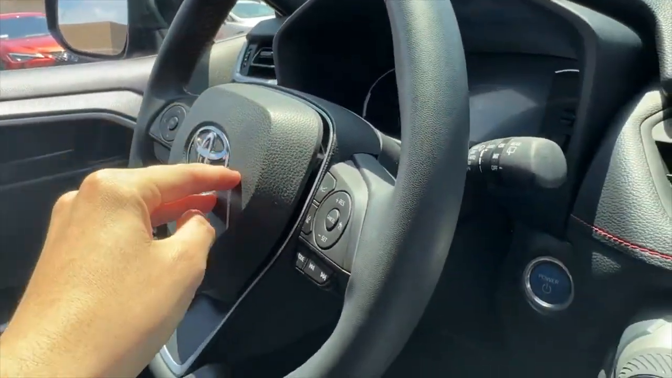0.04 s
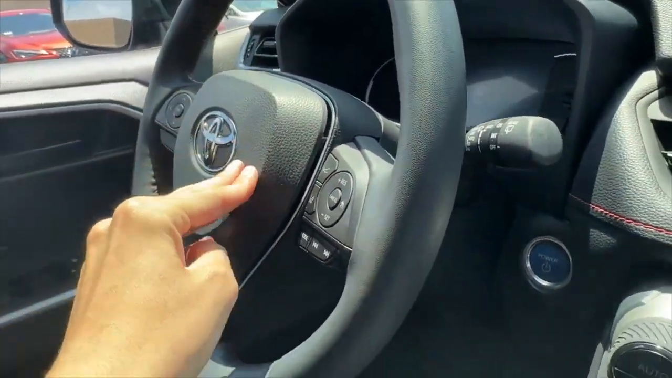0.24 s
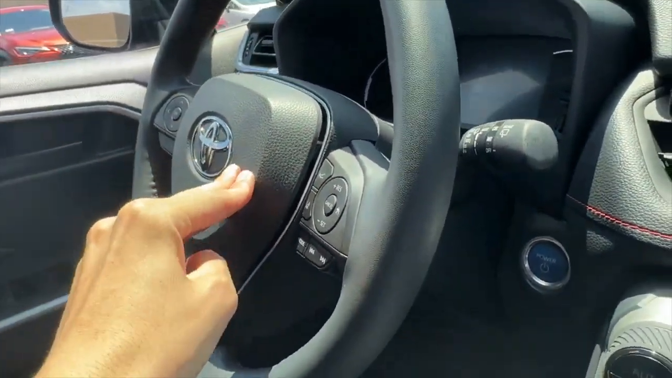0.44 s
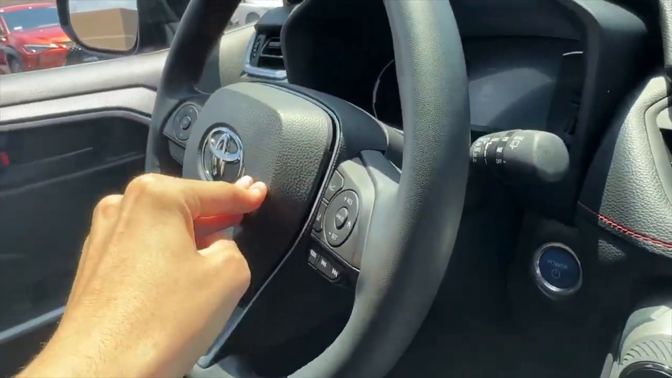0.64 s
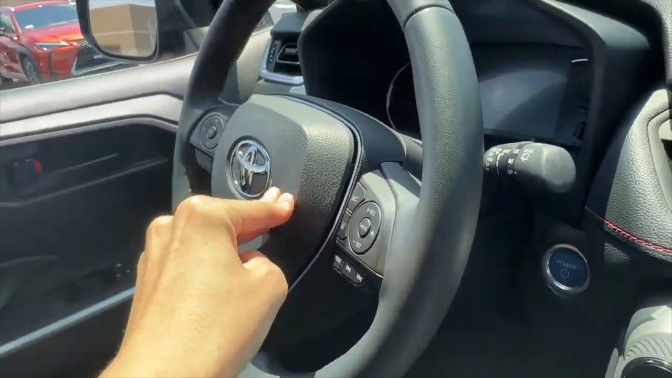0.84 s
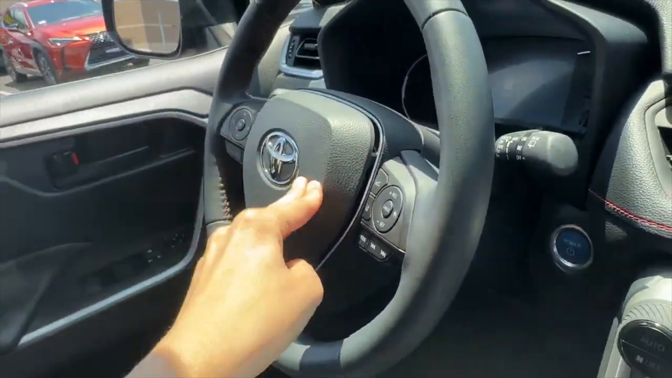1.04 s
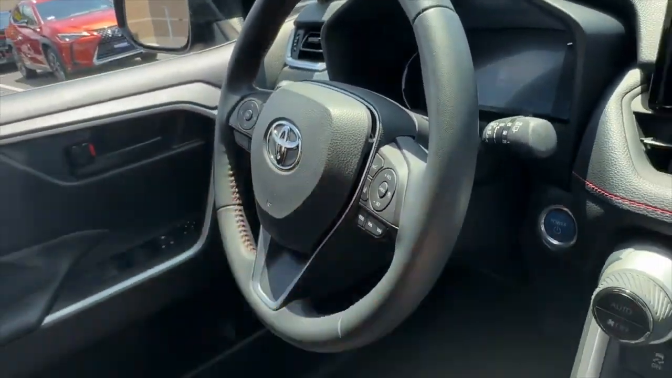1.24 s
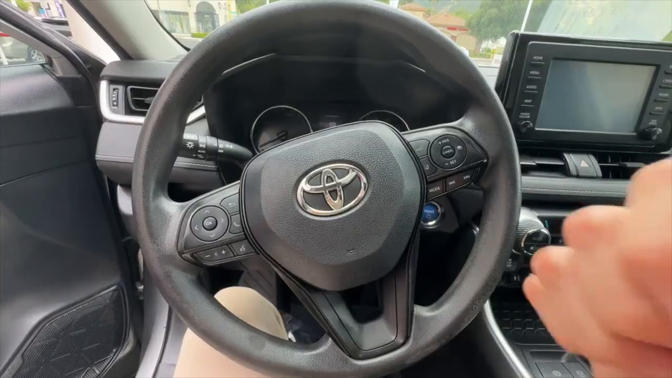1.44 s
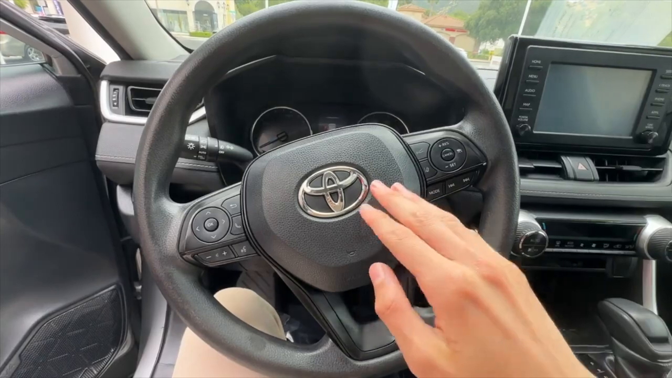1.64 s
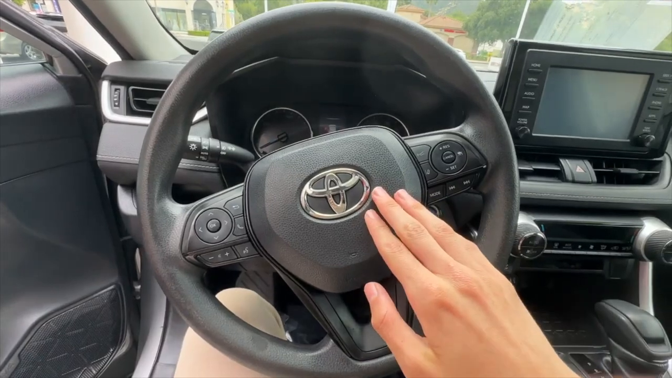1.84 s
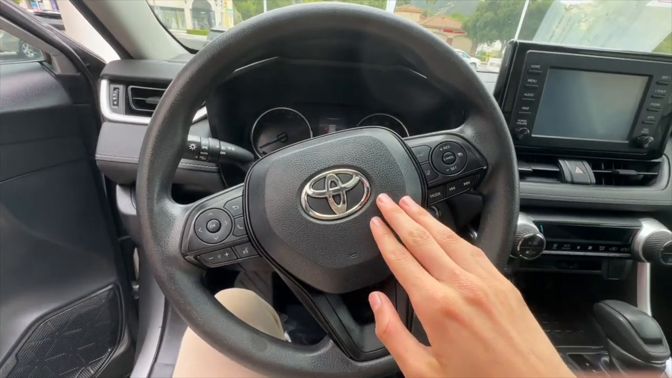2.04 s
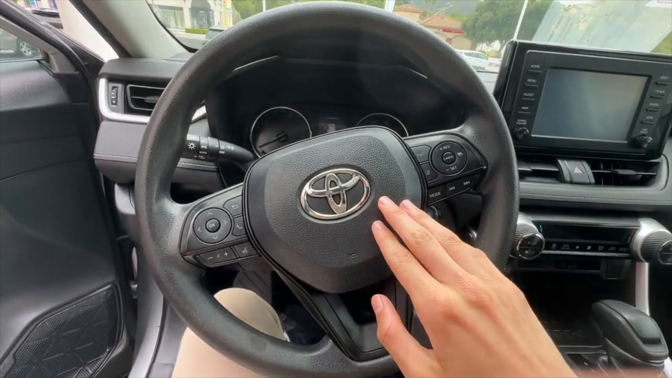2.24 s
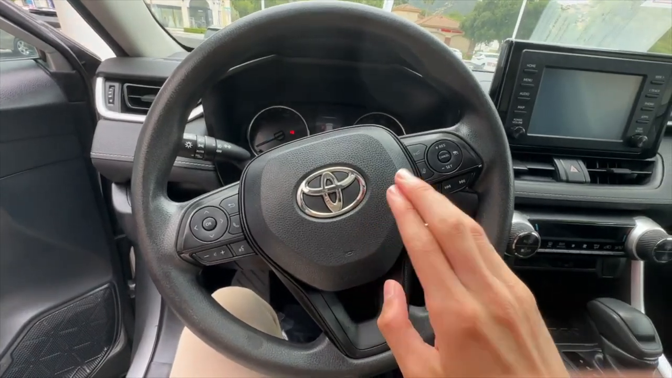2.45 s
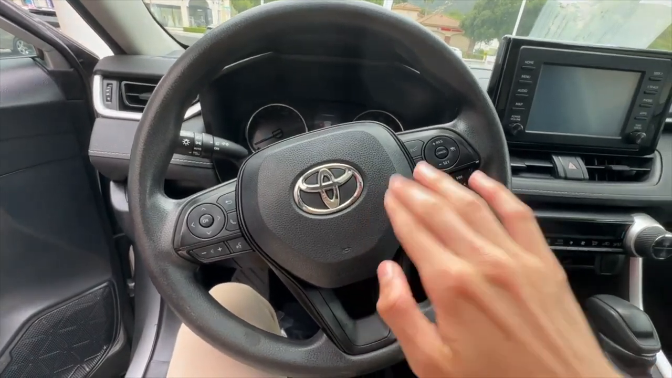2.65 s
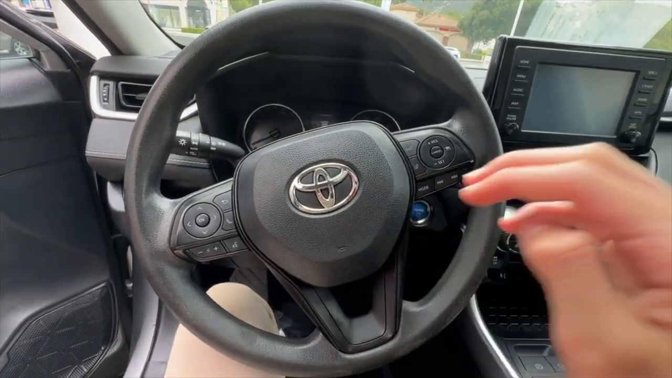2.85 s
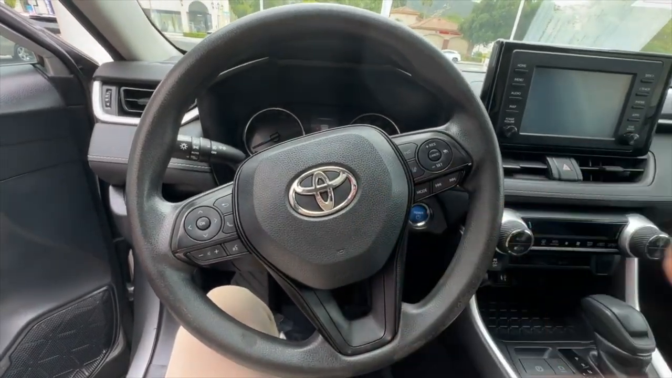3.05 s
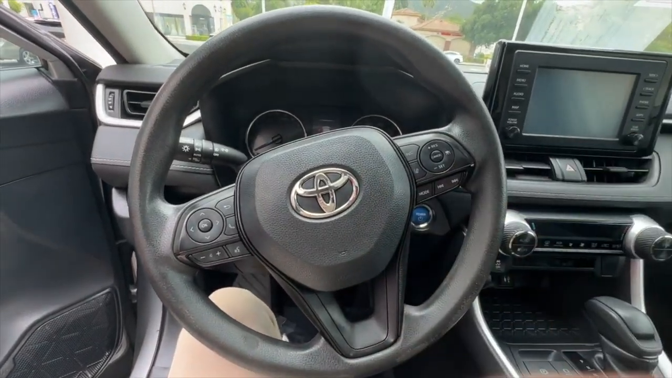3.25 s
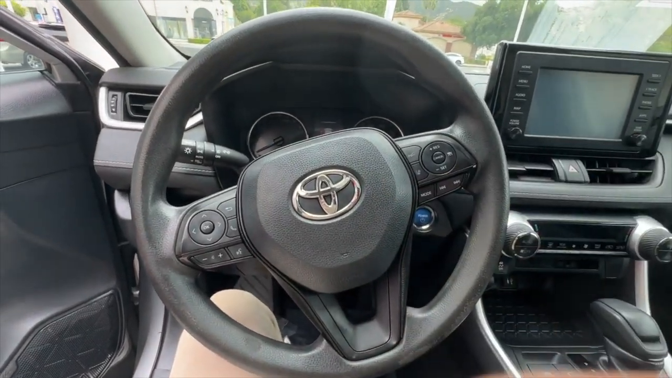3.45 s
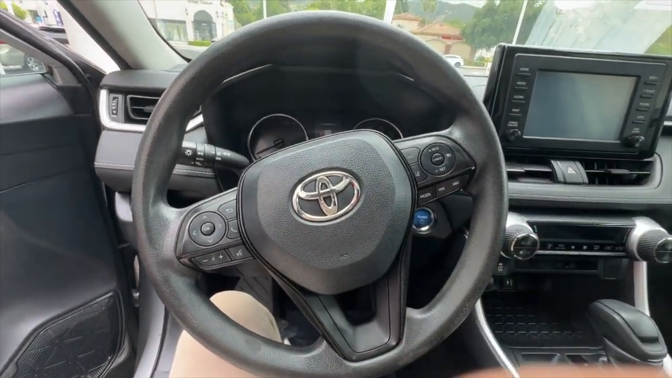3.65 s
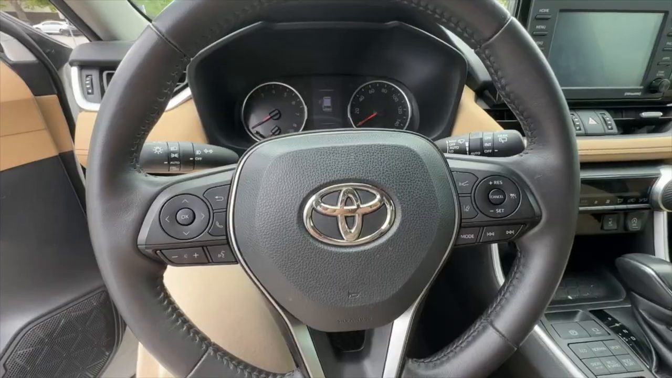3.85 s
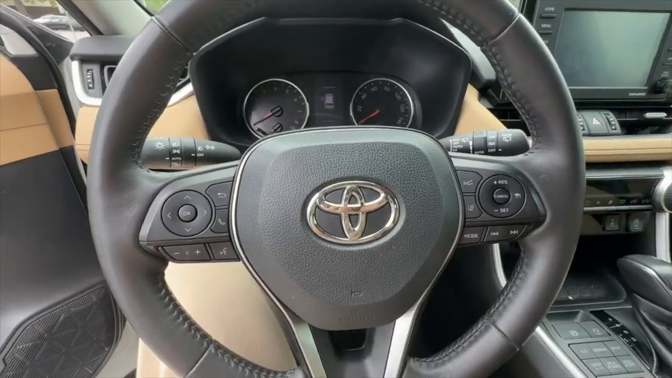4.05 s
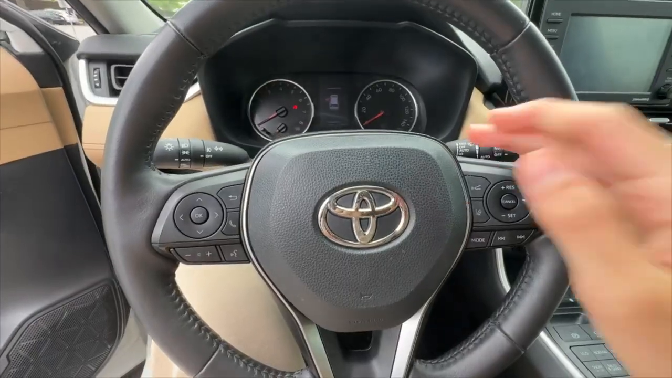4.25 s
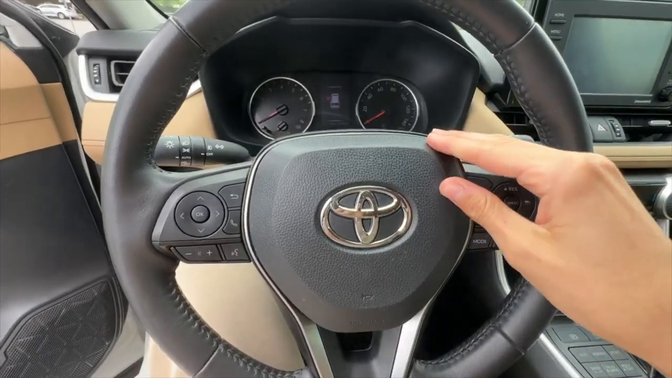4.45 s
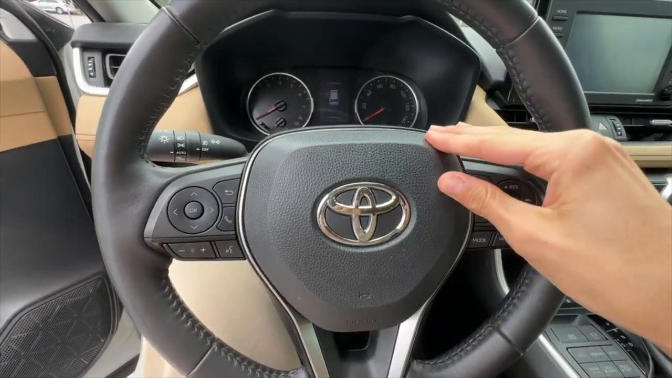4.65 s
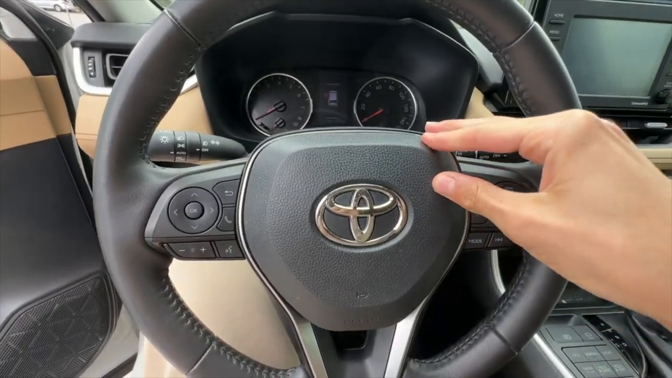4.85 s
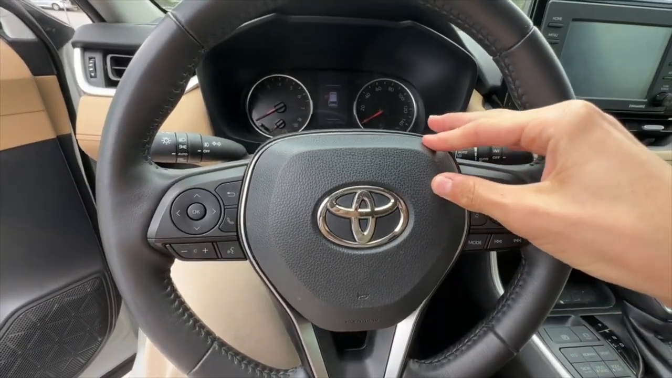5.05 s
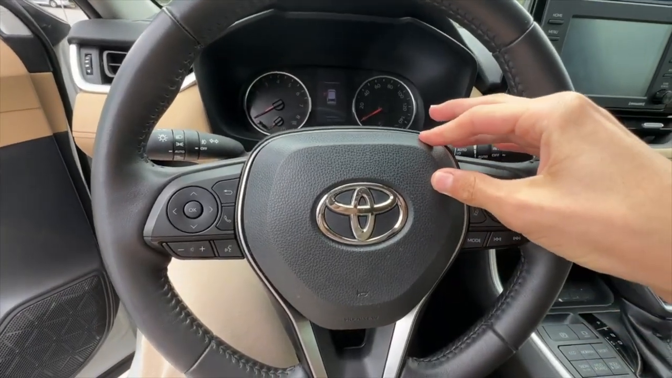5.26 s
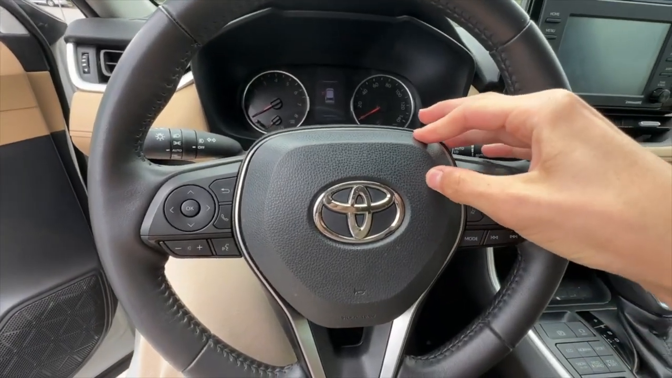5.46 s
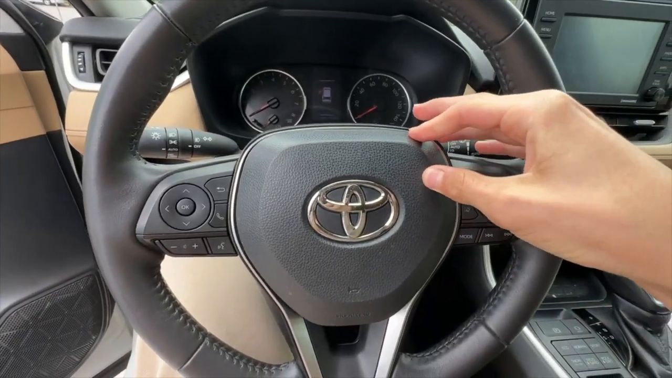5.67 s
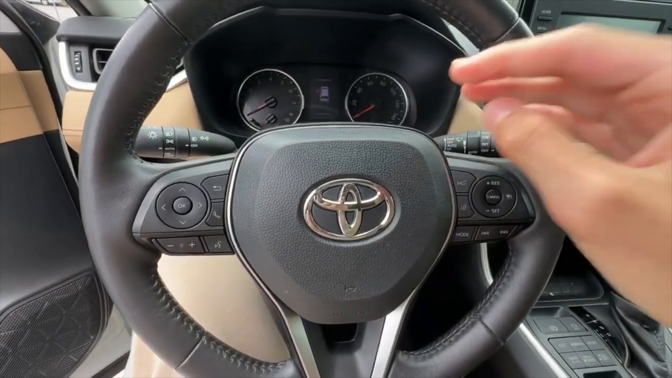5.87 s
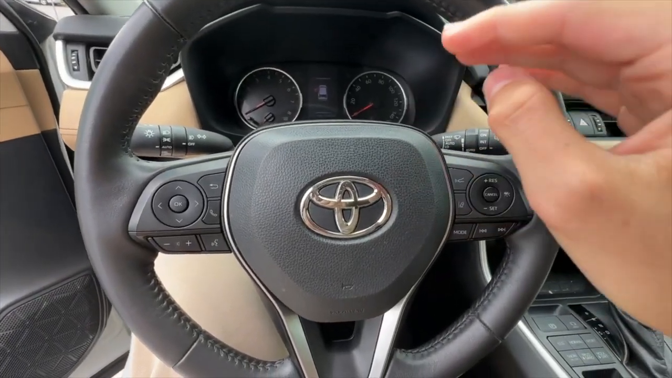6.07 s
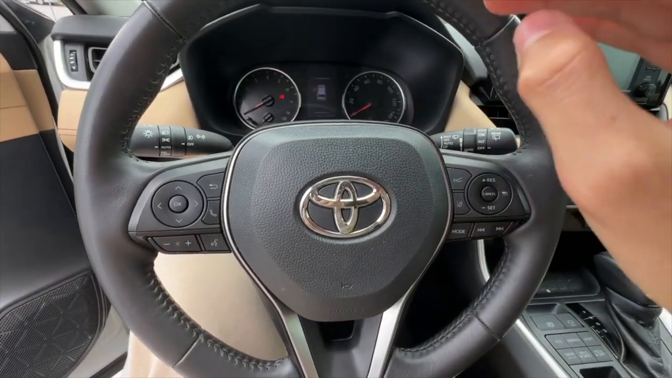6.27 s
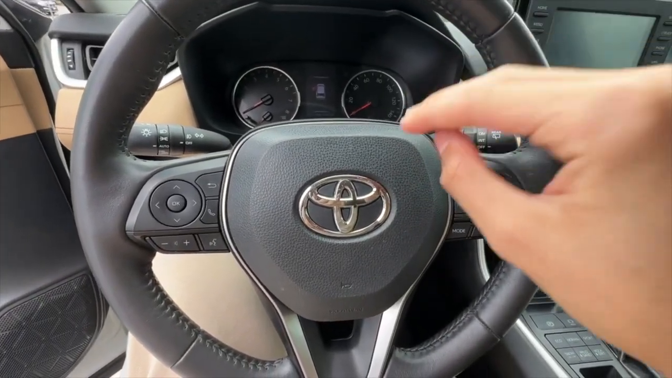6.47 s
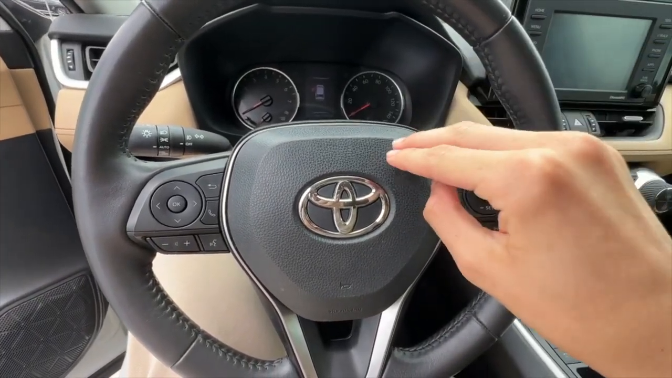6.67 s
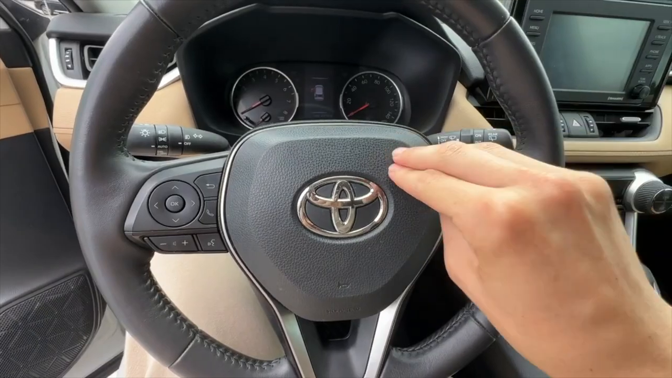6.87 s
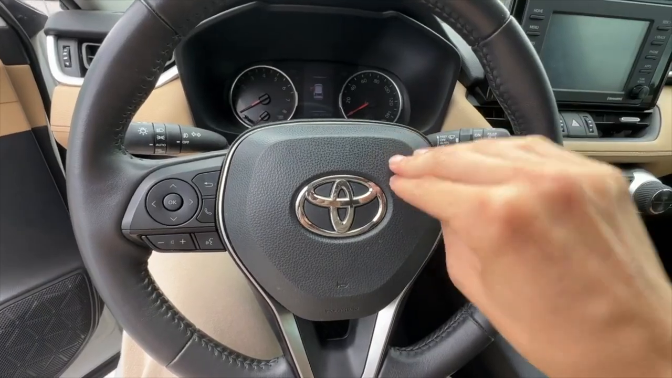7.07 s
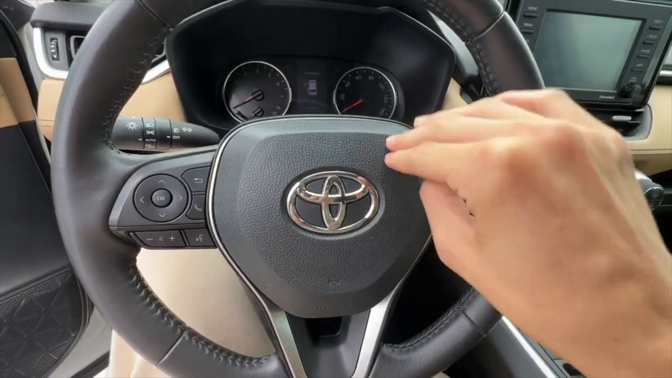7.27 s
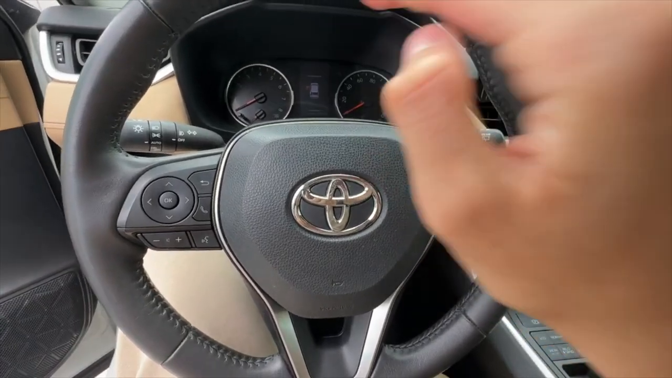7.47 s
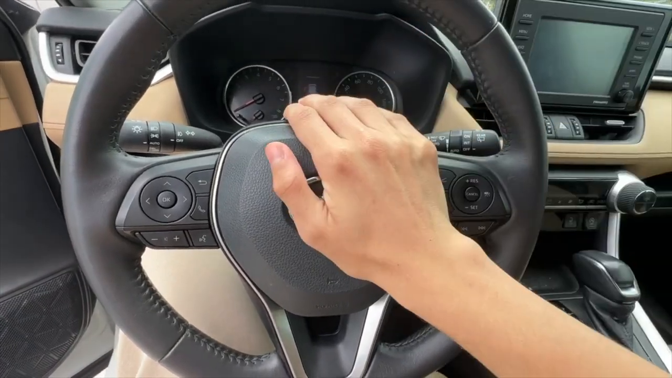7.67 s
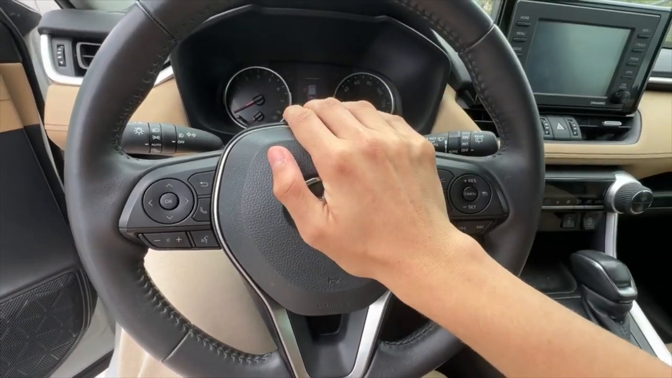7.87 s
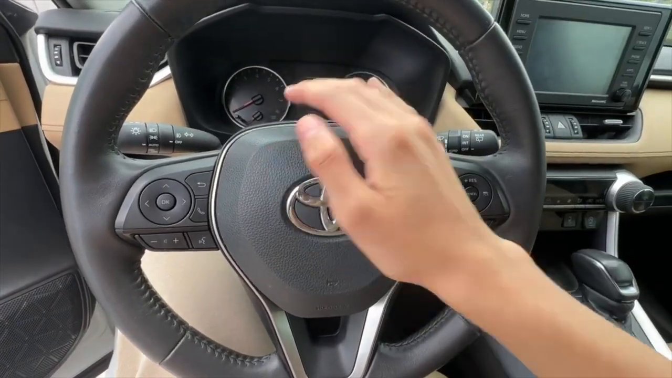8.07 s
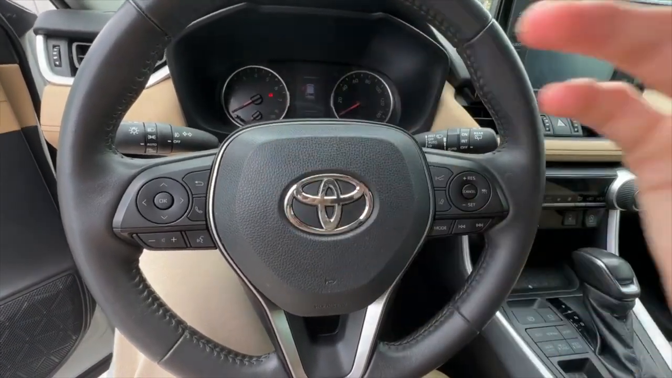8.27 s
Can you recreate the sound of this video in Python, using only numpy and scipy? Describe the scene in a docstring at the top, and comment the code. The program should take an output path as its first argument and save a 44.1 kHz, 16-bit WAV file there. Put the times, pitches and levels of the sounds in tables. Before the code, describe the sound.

In a parked car, faint air and traffic noise and low rumble sit under light taps on the wheel pad. From 0.2 s a two-note buzzing horn gives three very short honks, then a longer blast from 0.6 to 1.0 s, with small taps and skin rustle after. A brief silent cut at 1.4 s leads to a second cabin, quiet until a hard hollow knock at 2.5 s and a clipped, rattly beep that echoes outside. Another cut at 3.7 s: brushing, soft clicks, two faint bird whistles near 3.8 and 4.2 s. Light taps bring a tiny blip at 5.0 s, a short honk at 5.2 and a slightly longer one at 5.5. Soft knocks and boomy thuds around 7 s precede a heavy, sharp slap at 7.55 s, then a final honk from 7.7 to 7.95 s, its ring and echo fading into hand rustle.

```python
"""A pair of disc horns under the hood honks: low hum through the body, hammered buzz through the air and back
from the lot. Each is a set of wandering harmonics with clatter and free ringing. A hand taps and slaps the
steering-wheel pad (ringing modes, crack, hiss) and brushes it (grainy noise). Behind lie coloured air and
traffic noise, a narrow idle rumble and a faint whistling bird. Three shots inside parked cars, joined by
short silent cuts."""
import sys
import numpy as np
from scipy import signal
from scipy.io import wavfile
from scipy.ndimage import uniform_filter1d

SR = 44100
rng = np.random.default_rng(int(sys.argv[2]) if len(sys.argv) > 2 else 0)


def magnitude_from_level(level_db):
    """Linear magnitude for a level in decibels (20 dB per decade)."""
    exponent = np.asarray(level_db, float) / 20
    return 10 ** exponent


def digitize_waveform(pressure):
    """Quantize a signal to 16-bit integers and store it at the path in sys.argv[1].

    Rows of a 2-D input are taken as channels; values are limited to [-1, 1].
    """
    field = np.atleast_2d(pressure).T
    bounded = np.clip(field, -1, 1)
    quanta = np.round(bounded * 32767).astype(np.int16)
    wavfile.write(sys.argv[1], SR, quanta)


N = 366471

# shots: start_s, end_s, wash_db (before drift), cabin_right_delay_ms, wash_left_minus_right_db
SHOTS = [(0, 1.383, -45, -0.19, -1), (1.417, 3.684, -46.5, 0.37, 6), (3.718, 8.4, -44.5, .45, 5.5)]
# horn pair per car: low_horn_hz, high_horn_hz, start_pitch_offset_share, high_horn_buzz_rise_s, run_on_scale_s,
# buzz_t60_s, right_delay_ms, diffuse_echo_db, echo_t60_s
CARS = [(368.8, 419.5, -.025, 0.012, .03, .1, 0.019, -21, .45),
        (353.7, 417.85, 0.018, .012, 0.0158, 0.14, 0.1, -15, .9)]
# horn harmonics per car: harmonic, low_horn_left_db, low_horn_right_db, high_horn_left_db, high_horn_right_db
PARTIALS = [
    [(1, -33, -34, -37, -29), (2, -40, -52, -49, -50), (3, -53, -50, -53, -54), (4, -55, -53, -60, -60),
     (5, -58, -54, -57, -52), (6, -46, -46, -47, -43), (7, -42, -42, -41, -42), (8, -33, -30, -47, -44),
     (9, -36, -34, -42, -44), (10, -33, -34, -48, -44), (11, -50, -49, -48, -64), (12, -59, -63, -53, -58),
     (13, -63, -63, -52, -52), (14, -58, -58, -44, -55), (15, -56, -63, -58, -53), (16, -62, -62, -51, -56),
     (17, -57, -67, -53, -53), (18, -51, -55, -60, -59), (19, -63, -61, -60, -57), (20, -58, -62, -57, -57),
     (21, -68, -70, -64, -51), (22, -65, -69, -56, -58), (23, -57, -62, -60, -63), (24, -64, -59, -64, -64),
     (25, -57, -59, -76, -76), (26, -76, -72, -81, -81), (27, -74, -79, -74, -74), (28, -81, -81, -76, -76),
     (29, -76, -76, -69, -69), (30, -76, -76, -69, -69), (31, -83, -83, -76, -76), (32, -78, -78, -78, -78),
     (33, -69, -69, -75, -76), (34, -80, -80, -75, -76), (35, -72, -72, -75, -76), (36, -81, -81, -74, -75),
     (37, -72, -72, -75, -75), (38, -80, -80, -90, -90), (39, -73, -74, -90, -90), (40, -74, -73, -90, -90),
     (41, -74, -75, -90, -90), (42, -78, -80, -90, -90), (43, -90, -90, -90, -90), (44, -90, -90, -90, -90)],
    [(1, -33, -33, -33, -40), (2, -59, -48, -47, -59), (3, -51, -54, -58, -61), (4, -57, -56, -59, -58),
     (5, -44, -47, -54, -56), (6, -42, -48, -40, -51), (7, -44, -52, -36, -39), (8, -28.5, -38, -30, -50),
     (9, -20, -33, -37, -51), (10, -33, -44, -41, -52), (11, -42, -60, -37, -47), (12, -38, -45, -44, -60),
     (13, -38.5, -48, -50, -59), (14, -38, -53, -49, -59), (15, -46, -60, -49, -66),
     (16, -46, -58, -51, -57), (17, -51, -61, -56, -56), (18, -57, -58, -61, -66), (19, -57, -61, -49, -62),
     (20, -41, -56, -58, -62), (21, -60, -69, -55, -57), (22, -50, -61, -61, -57), (23, -50, -59, -67, -63),
     (24, -61, -58, -61, -58), (25, -57, -61, -60, -58), (26, -61, -57, -55, -55), (27, -57, -54, -61, -60),
     (28, -51, -50, -67, -67), (29, -57, -53, -73, -73), (30, -53, -52, -68, -68), (31, -57, -56, -58, -58),
     (32, -59, -59, -69, -67), (33, -69, -69, -63, -62), (34, -61, -61, -73, -73), (35, -70, -70, -65, -63),
     (36, -65, -65, -64, -64), (37, -69, -69, -76, -76), (38, -57, -57, -90, -90), (39, -63, -62, -90, -90),
     (40, -71, -73, -90, -90), (41, -79, -79, -90, -90), (42, -72, -78, -90, -90), (43, -73, -73, -90, -90),
     (44, -81, -81, -90, -90)],
]
# hiss spectrum of skin on vinyl, leather or cloth: frequency_hz, relative_db
SKIN = [(1500, -16.5), (3000, 2), (6000, -11), (9500, -3), (12000, -9), (15500, -18.5), (17000, -53.5)]


def evened(x):
    """Scales to rms 1."""
    return x / np.sqrt(np.mean(x ** 2) + 1e-20)


def read(points, hz):
    """Reads a spectrum on a log-frequency axis."""
    f, value = np.transpose(points)
    return np.interp(np.log(hz + 1), np.log(f + 1), value)


def add(mix, s, sound):
    """Mixes a two-channel sound in at time s."""
    part = mix[:, round(s * SR):][:, :sound.shape[1]]
    part += sound[:, :part.shape[1]]


def fading(t, t60):
    """Decay by 60 dB in t60."""
    return magnitude_from_level(-60 * np.maximum(t, 0) / t60)


def peak(t, s, db, rise_db_per_s, fall_db_per_s):
    """Gain that climbs to db at time s and falls again, both at a steady rate in dB."""
    return magnitude_from_level(db - np.where(t < s, rise_db_per_s * (s - t), fall_db_per_s * (t - s)))


def shot_at(t):
    """Index of the shot that runs at time t."""
    return np.searchsorted(np.transpose(SHOTS)[1], t)


def running(start, end):
    """Gain of one shot: a quick fade in after a cut, a sharp end."""
    t = np.arange(N) / SR
    fade_in = np.clip((t - start) / 0.0099 + (start == 0), 0, 1)
    return fade_in * np.clip((end - t) / .003, 0, 1)


def noise(size, colour, same, patchy_db):
    """Two-channel noise from random short-time spectra with drifting patches; same sets left-right likeness."""
    hz = np.fft.rfftfreq(1024, 1 / SR)
    a, b, c, d, patches = rng.standard_normal((size // 256 + 5, 513, 5)).T
    patches = uniform_filter1d(patches, size=8, axis=0)
    patches = evened(uniform_filter1d(patches, size=12, axis=1))
    like = np.clip(read(same, hz), 0, 1)[:, None]
    left = a + 1j * b
    right = like * left + np.sqrt(1 - like ** 2) * (c + 1j * d)
    z = np.array([left, right]) * magnitude_from_level(read(colour, hz)[:, None] + patchy_db * patches)
    return evened(signal.istft(z, nperseg=1024, noverlap=768)[1][:, :size])


def wash():
    """Air and traffic noise, coloured by each cabin, drifting in level."""
    # spectrum per shot: frequency_hz, relative_db_per_hz
    wash_spectra = [
        [(53, -40), (90, -12.5), (150, -0.5), (186, -21), (221, -7.5), (347, -20.5), (499, -23), (532, -26),
         (799, -15), (1150, -13.5), (1730, -20), (6240, -41.5), (15000, -59)],
        [(35, -37.5), (60, -7.5), (97, 1.5), (132, -12), (199, -1), (246, -21), (295, -7.5), (355, -32.5),
         (503, -11.5), (564, -23.5), (816, -10.5), (960, -15), (1420, -16), (5950, -44), (15000, -70)],
        [(47, -37), (80, -1), (148, -10.5), (196, -3.5), (244, -25), (304, -11), (503, -17), (613, -23),
         (993, -12.5), (1210, -19.5), (1720, -24), (2490, -36), (2900, -34), (3690, -43), (15000, -77.5)],
    ]
    # left-right likeness: frequency_hz, likeness_share
    likeness = [(60, 0.91), (250, 0.82), (1000, 0.65), (3000, 0.35), (10000, 0.46)]
    # level drift: time_s, level_db
    drift = [(0, 2), (.3, 3), (1.1, 3), (1.5, -0.5), (2.5, 0.5), (3.6, 1.5), (4.2, -1), (5, 0), (6, -1),
             (7, -1), (8.3, 0)]
    out = np.zeros((2, N))
    for (start, end, db, _, pan_db), colour in zip(SHOTS, wash_spectra):
        part = noise(round((end - start) * SR), colour, likeness, patchy_db=1.5)
        add(out, start, part * magnitude_from_level(db + np.array([[pan_db], [-pan_db]]) / 2))
    return out * magnitude_from_level(np.interp(np.arange(N) / SR, *np.transpose(drift)))


def rumble():
    """The cabin booms in a narrow wandering band, swelling when the hand leans on the wheel or lets go."""
    # steady boom per shot, before panning: level_db
    idle_db = [-45, -58, -47.5]
    # swells, before panning: peak_s, peak_db
    swells = [(.07, -34), (.31, -32), (.42, -32), (.6, -40), (.74, -38), (1.06, -33), (1.36, -36),
              (1.76, -44), (2.58, -34), (2.67, -33), (2.93, -46), (4.25, -42), (4.9, -41), (5.09, -40),
              (5.25, -39), (5.41, -41), (5.57, -40), (6.87, -37), (7.07, -30), (7.26, -28), (7.59, -23),
              (8.02, -31.5), (8.21, -41)]
    boom_hz = 53
    t = np.arange(N) / SR
    slow_t = t[::64]
    level = magnitude_from_level(np.array(idle_db))[shot_at(slow_t)]
    for s, db in swells:
        level = level + peak(slow_t, s, db, rise_db_per_s=200, fall_db_per_s=190)
    lowpass = signal.butter(2, 9., fs=SR, output="sos")
    wander = signal.sosfilt(lowpass, rng.standard_normal((2, N)))
    envelope = 0.69 + evened(wander[0]) + 1j * evened(wander[1])
    boom = evened((np.exp(2j * np.pi * boom_hz * t) * envelope).real)
    return boom * np.interp(t, slow_t, level) * magnitude_from_level(np.array([[.4], [-.4]]))


def bird(length_s, start_hz, end_hz, db):
    """A faint whistle gliding between two pitches, wavering at random."""
    t = np.arange(round(length_s * SR)) / SR
    waver = evened(uniform_filter1d(rng.standard_normal(len(t)), size=200))
    pitch_hz = start_hz + (end_hz - start_hz) * t / length_s + 90 * waver
    turns = np.cumsum(pitch_hz) / SR
    return magnitude_from_level(db) * np.hanning(len(t)) * np.sin(2 * np.pi * turns) * np.ones((2, 1))


def rustle():
    """Hand and sleeve brushing leather and cloth: fine grainy hiss."""
    # brushes: peak_s, peak_db, fade_by_20_db_s
    brushes = [(.044, -72, .12), (1.07, -63, .05), (1.29, -75, .04), (1.51, -74, .22), (3.03, -76, .08),
               (3.29, -83, .15), (3.65, -82, .15), (3.73, -80, .03), (3.925, -76, .06), (3.975, -66, .08),
               (4.15, -70, .14), (4.28, -80, .12), (4.38, -69, .11), (6.832, -72, .04), (6.904, -75, .07),
               (7.23, -78, .15), (7.5, -78, .06), (8.16, -68, .08), (8.27, -71, .15)]
    rise_share = .8  # rise time over fade time
    t = np.arange(N) / SR
    slow_t = t[::64]
    level = sum(peak(slow_t, s, db, 20 / (rise_share * fade_s), 20 / fade_s) for s, db, fade_s in brushes)
    grains = magnitude_from_level(1.8 * evened(uniform_filter1d(rng.standard_normal(N), size=100)))
    hiss = noise(N, SKIN, [(100, .6), (15000, 0.71)], patchy_db=4.0)
    return evened(hiss * grains) * np.interp(t, slow_t, level)


def tap(knock_db, thump_db, hiss_db, hard_db_per_octave):
    """A short uneven contact rings the pad's modes with a dry crack; skin on vinyl adds a hiss."""
    # modes of wheel pad and column, under 300 Hz the thump: frequency_hz, relative_db, t60_s
    pad_modes = [(54, -5.5, 0.36), (101.7, 2, 0.2), (122, -2.5, 0.19), (151.5, -3.5, 0.16), (208, -3.5, .1),
                 (271, -9.5, 0.071), (341.5, -7.5, .07), (539, -0.5, 0.052), (652, 0, 0.058),
                 (822, -2, 0.048), (1129, -7, 0.057), (1366, -6.5, 0.041), (1742, -7, 0.053),
                 (2240, -11, 0.057), (2810, -23, 0.057), (3700, -12, .04)]
    ring_db, crack_db = -3.5, -12.5  # relative to knock_db
    contact_s = .0088
    pan_db = 4.5 + 1.5 * rng.standard_normal()
    t = np.arange(round(.3 * SR)) / SR

    hz, db, t60 = np.transpose(pad_modes)[:, :, None]
    level_chance, pitch_chance, phase_chance = rng.standard_normal((3, len(pad_modes), 1))
    knock_modes_db = knock_db + ring_db + hard_db_per_octave * np.log2(hz / 650)
    db = db + np.where(hz < 300, thump_db, knock_modes_db) + 1.65 * level_chance
    start = 1 - np.exp(-t * hz / 1.3)  # low modes take longer to swing up
    waves = np.sin(2 * np.pi * (hz * (1 + 0.022 * pitch_chance) * t + 0.14 * phase_chance))
    ring = (magnitude_from_level(db) * start * fading(t, t60) * waves).sum(0)

    burst = (1 - np.exp(-t / (.2 * contact_s))) * (np.exp(-t / contact_s) + 0.057 * fading(t, 0.21))
    grit = magnitude_from_level(1.9 * rng.exponential(1, len(t)))
    hiss = noise(len(t), SKIN, [(3000, 0.6), (12000, 0.74)], patchy_db=2.0)
    hiss = evened(hiss * grit) * burst * magnitude_from_level(hiss_db)
    band = signal.butter(1, [500, 3000], "band", fs=SR, output="sos")
    crack = evened(signal.sosfilt(band, rng.standard_normal(len(t))))
    crack = crack * burst * magnitude_from_level(knock_db + crack_db + hard_db_per_octave)

    body = (ring + crack) * magnitude_from_level(np.array([[pan_db], [-pan_db]]) / 2)
    body[1] = np.roll(body[1], round(.15 * SR / 1000))  # the wheel is slightly nearer the left microphone
    return body + hiss


def lot(x, car, shot):
    """Echoes from parked cars and walls: sparse random taps, a dying spread plus clusters, dulled by the air."""
    # wall echoes per shot: delay_s, level_db
    wall_echoes = [
        [(.045, -16), (.11, -28)],
        [(.08, -9), (.21, -24), (.33, -27), (.61, -25)],
        [(.07, -16), (.2, -22), (.32, -35)],
    ]
    *_, diffuse_db, t60 = CARS[car]
    t = np.arange(SR) / SR
    parts = [(fading(t, t60) * (t > .03), diffuse_db)]
    parts += [(np.exp(-((t - s) / .008) ** 2), db) for s, db in wall_echoes[shot]]
    taps = rng.choice([-1., 1.], (2, SR)) * (rng.random((2, SR)) < .05)
    taps *= sum(magnitude_from_level(db) * part / np.linalg.norm(part * taps[0]) for part, db in parts)
    hz, s, z = signal.stft(taps, SR, nperseg=256)
    air = magnitude_from_level(-9 * s * (hz[:, None] / 11000) ** 2)
    tail = signal.istft(z * air, SR, nperseg=256)[1]
    weak_bass = signal.sosfilt(signal.butter(1, 1200., "high", fs=SR, output="sos"), x)
    return signal.fftconvolve(weak_bass, tail, axes=1)


def horn_tone(t, since, h, car, hum, blows, buzz_gain, late_s, unsettled, phases):
    """One horn's harmonics: the first is the hum, the rest the buzz, each swaying and letting go by itself."""
    _, _, offset, rise_s, run_on_s, buzz_t60, delay_ms, *_ = CARS[car]
    hz = CARS[car][h]
    rise_s *= 3.8 if h == 0 else 1  # the low horn builds up slowly
    order, *levels = np.transpose(PARTIALS[car])
    order = np.round(order)
    column = order[:, None]
    slow_t, slow_since = t[::8], since[::8]

    shake = evened(uniform_filter1d(rng.standard_normal(len(t)), size=150))
    pitch_hz = hz * (1 + offset * np.exp(-t / 0.0251) + 0.0204 * unsettled * shake)
    turns = np.cumsum(pitch_hz) / SR

    # each buzz partial swells and sinks slowly at its own random speed
    speed, start, linger = rng.random((3, len(order), 1))
    built = 1 - np.exp(-np.maximum(slow_t - late_s, 0) / rise_s)
    release = fading(slow_since - 1.6 * linger * run_on_s, buzz_t60)  # partials let go one by one
    sway = magnitude_from_level(2.6 * np.sin(2 * np.pi * ((1.1 + 4.5 * speed) * slow_t + start)))
    # the disc rings on below 4400 Hz, the top follows the blows
    sway *= np.where(column * hz < 4400, built * release * buzz_gain, built * blows[::8])
    flutter = uniform_filter1d(rng.standard_normal((*sway.shape, 2)) @ [1, 1j], size=45, axis=1)
    sway = sway * (1 + .16 * flutter / flutter.std())
    sway[0] = hum[::8]

    waves = np.exp(2j * np.pi * column * turns) * np.repeat(sway, 8, axis=1)[:, :len(t)]
    lag_turns = (order * hz * delay_ms / 1000 + .07 * phases[1]) * (order * hz < 10000)
    left_right_turns = phases[0] - np.array([0 * lag_turns, lag_turns])
    gains = magnitude_from_level(np.array(levels[2 * h:2 * h + 2])) * np.exp(2j * np.pi * left_right_turns)
    return (gains @ waves).real


def free_ringing(t, since, press_s, hum_db, buzz_db, car):
    """Diaphragms swing free after the current stops, each mode wavering as it decays."""
    # free modes per car: frequency_hz, relative_db, t60_s
    free_modes = [
        [(319, -29, .3), (405, -36, .15), (3030, -50, .2)],
        [(341.3, -31.5, 0.26), (362.5, -37, 0.32), (407.6, -33.5, 0.27), (2910, -36, .8), (3540, -46, 0.6)],
    ]
    swing = np.clip(since / 0.011, 0, 1) * np.clip((t[-1] - t) / .15, 0, 1)
    built_db = 20 * np.log10(min(press_s / .08, 1))  # a short press leaves the disc barely ringing
    out = np.zeros(len(t))
    for hz, db, t60 in free_modes[car]:
        gain = magnitude_from_level(db + (hum_db if hz < 1000 else buzz_db + built_db))
        beat = 1 + .6 * np.sin(2 * np.pi * (9 * since + rng.random()))
        out += gain * swing * fading(since, t60) * np.sin(2 * np.pi * hz * since) * beat
    return out


def honk(on, off, hum_db, buzz_db, car, phases):
    """Two self-interrupting horns: prompt hum, hammered buzz building up, free ringing after release."""
    # hammer against pole: frequency_hz, relative_db
    clatter_spectrum = [(1500, -25), (2500, -8), (3200, 0), (4500, -6), (8000, -10), (11000, -11),
                        (12500, -22), (15000, -30), (17000, -50)]
    press_s = off - on
    late_s = 0.011  # the buzz takes the longer way through the air
    t = np.arange(round((press_s + .45) * SR)) / SR
    since = t - press_s  # time after release

    hum = (1 - np.exp(-t / 0.015)) * fading(since, .06) * magnitude_from_level(hum_db)
    blows = (1 - np.exp(-np.maximum(t - late_s, 0) / .015)) * fading(since - late_s, .15) * magnitude_from_level(buzz_db)
    rattle = .045 + 1.15 * np.exp(-press_s / .038)  # the briefer the press, the more the horn rattles
    unsettled = rattle + .5 * np.exp(-t / 0.028) + 0.14 * (since > 0)  # blows are uneven at start and end

    out = np.zeros((2, len(t)))
    for h in range(2):
        out += horn_tone(t, since, h, car, hum, blows, magnitude_from_level(buzz_db), late_s, unsettled, phases[h])
    clatter = noise(len(t), clatter_spectrum, [(3000, .5), (11000, .95)], patchy_db=2.5)
    out += clatter * blows * (unsettled + .12) * magnitude_from_level(-40)
    out += free_ringing(t, since, press_s, hum_db, buzz_db, car)
    wet = lot(out, car, shot_at(on))
    add(wet, 0, out)
    return wet


def scene():
    """Three shots with fades at the cuts; the cabin noise reaches the two microphones at different times."""
    # taps: start_s, knock_db, thump_db, skin_hiss_db, hardness_db_per_octave
    taps = [(0.213, -33, -33, -50, -5), (0.294, -30.5, -33, -43, -3), (0.358, -26.5, -41, -46, -8.5),
            (0.44, -35, -35, -52, -1.5), (0.468, -28, -38, -51, -6), (0.564, -31, -47, -53, -5),
            (0.609, -34, -28.5, -49, -1.5), (0.664, -36, -32, -44, 2), (0.788, -37, -49, -45, -6),
            (0.829, -29.5, -34.5, -48, -1.5), (0.919, -40, -41, -47, -7), (0.979, -35, -36, -47, -3),
            (1.088, -38, -39, -61, -5), (1.124, -42, -50, -66, -7), (1.301, -33.5, -42, -69, 3),
            (2.535, -6, -21, -40, -1.5), (2.604, -21, -34, -49, 1), (3.941, -38.5, -52, -67, -7),
            (3.967, -36.5, -32, -60, -1.5), (4.123, -38, -51, -71, 1.5), (4.543, -46, -56, -59.5, 3),
            (4.555, -58, -47, -42, 0), (4.593, -40.5, -49, -46, 2), (4.764, -41.5, -55, -44, 3),
            (4.836, -36, -52, -62, -1), (4.919, -41, -42, -65, 2), (4.962, -41.5, -55, -59, 0),
            (5.011, -35, -38, -45.5, -5), (5.171, -42, -58, -50, -1.5), (5.182, -32, -35, -51, -4),
            (5.333, -32.5, -49, -47, -5), (5.444, -38, -36.5, -53, -2), (5.667, -36, -45, -51, 1),
            (6.832, -44, -38, -65, -1.5), (6.9, -46, -40, -66, -1.5), (7.003, -26, -45, -57, -3),
            (7.019, -35, -30, -60, -2), (7.084, -46, -57, -63, 1), (7.158, -30, -29.5, -55, -2.5),
            (7.544, -10, -20, -17.5, 0.5), (7.546, -5, -12.5, -23, -1), (7.569, -11.5, -9.5, -27.5, 0),
            (7.951, -32, -52, -50, 0)]
    # distant bird: start_s, length_s, start_hz, end_hz, level_db
    chirps = [(3.82, .07, 2700, 2900, -66), (4.17, .12, 3700, 3500, -64)]
    # honks: contact_closes_s, contact_opens_s, hum_db, buzz_db (gains)
    honks = [(0.23, 0.297, 0, -5), (.378, 0.449, -0.5, -4), (0.493, 0.563, -1, -4),
             (0.596, 1.012, -0.5, -1.5), (2.561, 2.599, 7.5, 2), (4.976, 5.0, 1, -6),
             (5.196, 5.33, 0, -1.5), (5.461, 5.655, -0.5, -1), (7.689, 7.949, 0, -2.5)]
    cabin, near = wash() + rumble(), rustle()
    for s, *row in chirps:
        add(near, s, bird(*row))
    for s, *row in taps:
        add(near, s, tap(*row))
    phases = rng.standard_normal((2, 2, 2, len(PARTIALS[0])))  # car, horn, (phase, lag scatter), partial
    for on, *row in honks:
        car = min(shot_at(on), 1)  # the later shots share one kind of horn
        add(near, on, honk(on, *row, car, phases[car]))
    out = np.zeros((2, N))
    for start, end, _, delay_ms, _ in SHOTS:
        delayed = np.roll(cabin[1], round(delay_ms * SR / 1000))
        out += running(start, end) * (near + [cabin[0], delayed])
    return out


def band_limit(x):
    """A steep low-pass at the top of the band."""
    return signal.sosfilt(signal.butter(12, 16470, fs=SR, output="sos"), x)


def record(dry):
    """Microphone band limits and soft overload, silence at the cuts."""
    mix = signal.sosfilt(signal.butter(3, 38., "high", fs=SR, output="sos"), dry)
    mix = np.tanh(mix) * sum(running(*shot[:2]) > 0 for shot in SHOTS)
    mix = signal.sosfilt(signal.butter(16, 15900., fs=SR, output="sos"), mix)
    return band_limit(mix)


dry = scene()
out = record(dry)
digitize_waveform(out)
```